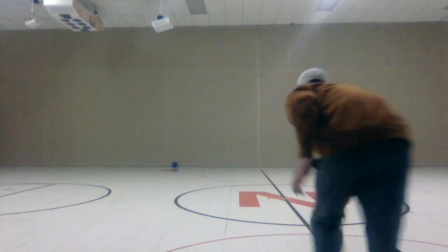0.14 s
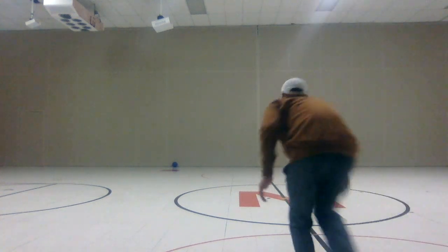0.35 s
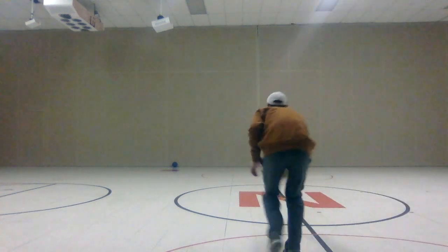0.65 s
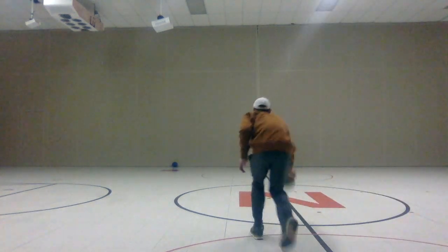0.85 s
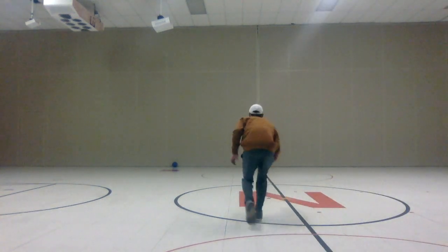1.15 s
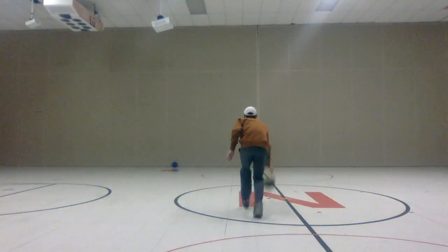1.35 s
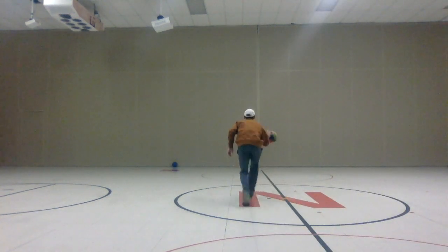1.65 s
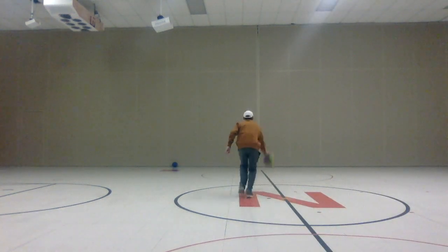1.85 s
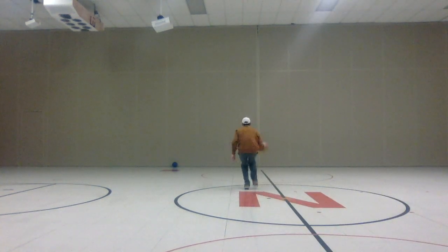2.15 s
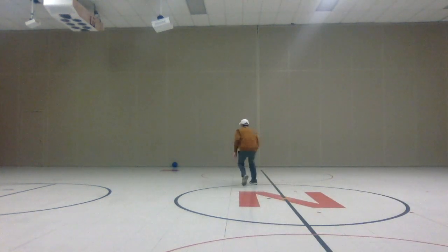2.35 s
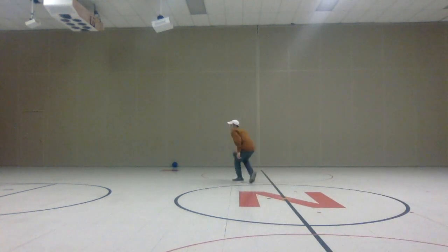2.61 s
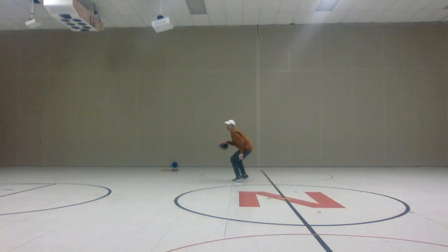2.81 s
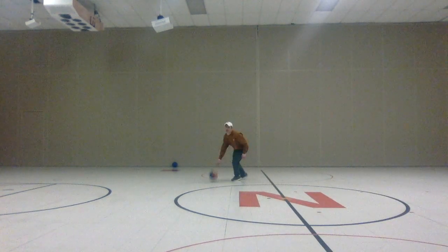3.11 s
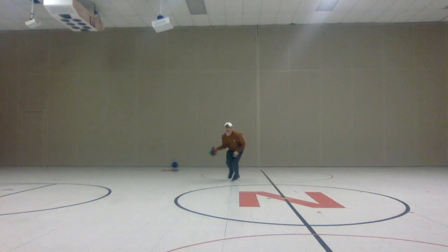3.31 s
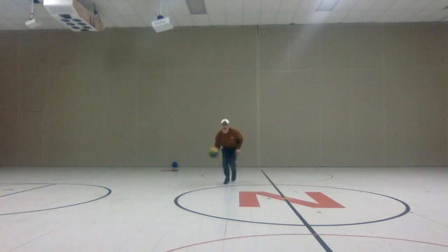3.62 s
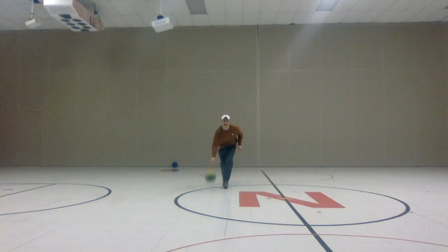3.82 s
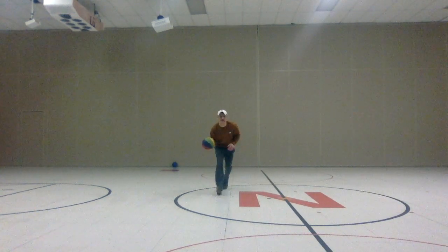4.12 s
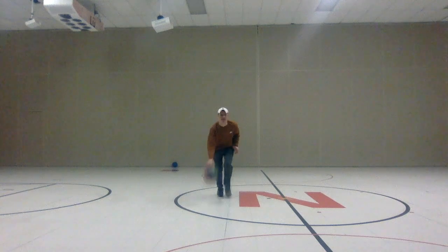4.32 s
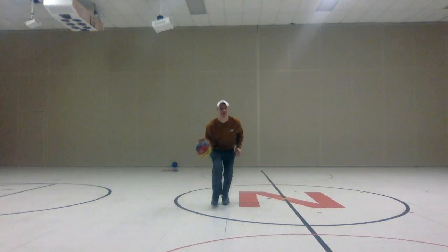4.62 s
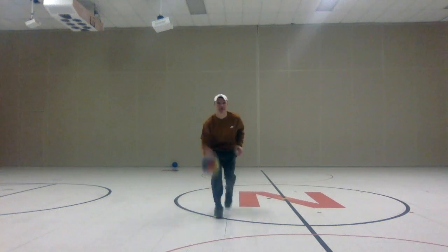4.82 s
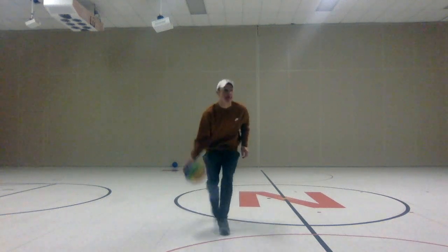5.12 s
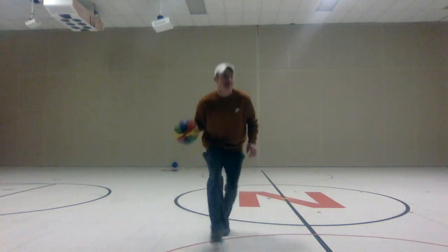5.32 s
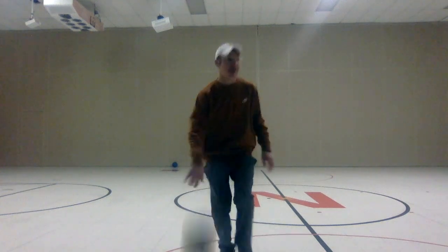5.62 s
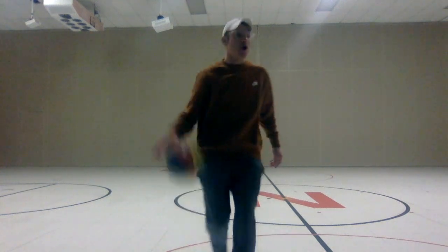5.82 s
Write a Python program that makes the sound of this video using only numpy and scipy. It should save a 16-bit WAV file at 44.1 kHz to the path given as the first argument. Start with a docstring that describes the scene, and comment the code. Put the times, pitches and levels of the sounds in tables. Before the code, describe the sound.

A ball is dribbled in a big, hard-walled, empty gym, heard through a small fixed microphone with thin deep bass and slightly clipped peaks. Sharp slaps with a short hollow boom, a floor thump and a faint airy ping fall at about 0.3, 0.85, 1.4 and 2.05 seconds, moving from roughly two to seven metres away and becoming more washed in echo. At 2.45 two quick heel knocks run into a brief, gritty sole skid with tiny squeaks, just before a softer, duller bounce at 2.6. Bounces at 3.2, 3.85, 4.45 and 5.05 come back, rounder and gradually closer. A small dry hand click comes at 5.5, then a loud, crisp, near bounce at 5.7. Every hit brings separate wall and ceiling echoes and a dense ring that is held up briefly, then ducks, leaving a faint lingering tail. Quiet, dull ventilation noise continues throughout.

```python
"""A player dribbles a ball away across the wooden floor of an empty gym, turns with a scuff of his shoes
and comes back. Each bounce is a shaped click for the slap, with damped sines for boards, shell and air.
His heels and skidding sole are noise bursts; a small click follows as the hand takes the ball.
Ceiling and walls answer with separate echoes that shift as he moves, then the hall rings out as decaying
noise in bands, its tail held up and pulled down by the recorder. Filtered noise is the ventilation."""
import sys
import numpy as np
from scipy import signal
from scipy.fft import rfft, irfft
from scipy.io import wavfile

SR = 44100
rng = np.random.default_rng(int(sys.argv[2]) if len(sys.argv) > 2 else 0)


def persist_wave(psi):
    """Save psi, clipped to +-1, as 16-bit WAV."""
    counts = np.round(np.clip(psi, -1, 1) * 32767).astype(np.int16)
    wavfile.write(sys.argv[1], SR, np.atleast_2d(counts).T)


N = 262511
RING = 65536  # samples in each struck sound and its reverberation
AGE = np.arange(RING) / SR  # s since the sound began
HZ = np.arange(RING + 1) * SR / (2 * RING)


def from_db(db):
    """Decibels to gain."""
    return 10 ** (np.asarray(db) / 20)


def at_hz(points, hz, axis=1):
    """Read one column of a table along a log-frequency axis."""
    points = np.array(points)
    return np.interp(np.log(np.maximum(hz, 1)), np.log(points[:, 0]), points[:, axis])


def at_distance(law, distance):
    """Level in dB of one part of a bounce at a given distance in metres."""
    db_at_zero, db_per_m = law
    return db_at_zero + db_per_m * distance


def ramp(start_s, length_s):
    """A straight rise from 0 to 1."""
    return np.clip((AGE - start_s) / length_s, 0, 1)


def convolve(a, b):
    """Pass one short sound through another."""
    return irfft(rfft(a, 2 * RING) * rfft(b, 2 * RING))[:RING]


def pulse(spectrum):
    """The most compact causal (minimum-phase) click with a given spectrum."""
    cepstrum = irfft(np.log(from_db(at_hz(spectrum, HZ))))
    cepstrum[1:RING] *= 2  # fold the cepstrum onto positive time
    return irfft(np.exp(rfft(cepstrum[:RING], 2 * RING)))[:RING]


def struck(modes, delay_s=0., polarity=1):
    """Damped sines set off by one blow; each mode is scaled by polarity once more than the one before."""
    age = np.maximum(AGE - delay_s, 0)
    total = np.zeros(RING)
    for k, (hz, db, t60_s) in enumerate(modes):
        decay = from_db(db - 60 * age / t60_s)
        total += polarity ** k * np.sin(2 * np.pi * hz * age) * decay
    return total


def burst(length_s):
    """Exponentially dying noise of unit energy."""
    noise = rng.standard_normal(RING) * np.exp(-np.minimum(AGE / length_s, 50))
    return noise / np.sqrt(np.sum(noise ** 2))


def add(out, s, sound):
    """Mix a sound in at a given time."""
    start = round(s * SR)
    out[start:start + RING] += sound[:N - start]


def mirrors(place, low, high):
    """A source and its images between two facing walls: (position m, dB)."""
    span = 2 * (low[0] + high[0])
    both_db = low[1] + high[1]
    return [(place, 0),
            (-2 * low[0] - place, low[1]), (2 * high[0] - place, high[1]),
            (place + span, both_db), (place - span, both_db)]


def echoes(sideways, distance, spreading=0.57):
    """Mirror-image echoes from walls and ceiling, timed and levelled against the direct sound."""
    # (metres from the microphone, reflection dB)
    left, right, behind, far = (13.61, -2), (11.8, 0.46), (1.42, -6), (12.24, 0)
    mic_height_m, ceiling_height_m, ceiling_db = 0.68, 5.36, -4  # heights above the floor
    sound_speed = 343  # m/s
    heights = [(mic_height_m, 0), (2 * ceiling_height_m - mic_height_m, ceiling_db)]
    images = []
    for x, x_db in mirrors(sideways, left, right):
        for y, y_db in mirrors(distance, behind, far):
            for z, z_db in heights:
                images.append((np.sqrt(x * x + y * y + z * z), x_db + y_db + z_db))
    path, db = np.transpose(images)  # the first one is the direct path
    lag = np.round((path - path[0]) / sound_speed * SR).astype(int)
    strength = from_db(db) * (path[0] / path) ** spreading
    return np.bincount(lag[1:], strength[1:], RING)[:RING]


def hall_bands(count=18, dulling_db=8, dulling_hz=9000, dulling_s=0.2):
    """Per band: its filter, the strength of single echoes, and a quick decay over a faint lingering one."""
    # diffuse sound of the hall: f/Hz, relative level of main decay/dB, its t60/s, lingering level/dB
    diffuse = [(60, -9, 0.94, -30), (123, -4.5, 0.98, -29), (232.4, 0, 0.83, -21.5), (448, 0, 0.67, -33),
               (824, 7.5, 0.35, -7), (1510, 8.5, 0.53, -19.5), (2800, -4, 0.8, -25), (4470, -1.5, 1, -33.5),
               (7100, -1.5, 0.74, -40), (9170, -5, 0.42, -44.5), (12600, 5, 0.35, -65),
               (16200, -15, .2, -66)]
    # colour of the single echoes: f/Hz, level/dB
    echo_colour = [(100, 0.5), (250, 3.5), (600, 4), (1400, 9.5), (2500, 0), (5000, 0), (9000, 5),
                   (16000, -4.5)]
    main_db, linger_t60_s = -1.28, 2.65
    near_peak_s, near_db = 0.016, -3
    walls_s, walls_rise_s = 0.042, 0.016
    hold_bass_db, hold_treble_db, bass_edge_hz = 5.5, 4.5, 190
    hold_rise_s, suppress_s, suppress_fall_s = 0.13, 0.24, 0.058

    centres = np.geomspace(50, 16000, count)
    # a puff scattered nearby, then a rise as the far walls answer
    near = from_db(near_db) * AGE / near_peak_s * np.exp(1 - AGE / near_peak_s)
    build_up = np.hypot(near, ramp(walls_s, walls_rise_s))
    # the recorder holds the tail up, then its noise suppression pulls it down
    hold = ramp(walls_s, hold_rise_s) * (1 - ramp(suppress_s, suppress_fall_s))
    bands = []
    for hz, member in zip(centres, np.eye(count)):
        band_filter = at_hz(np.c_[centres, member], HZ[::2])
        bass = 1 / (1 + (hz / bass_edge_hz) ** 4)
        hold_db = hold * (bass * hold_bass_db + (1 - bass) * hold_treble_db)
        # late treble dies ever faster
        loss_db = dulling_db * (hz / dulling_hz * AGE / dulling_s) ** 2
        dull = from_db(-np.minimum(loss_db, 100))
        decay_db = at_hz(diffuse, hz) - 60 * AGE / at_hz(diffuse, hz, axis=2)
        main = build_up * dull * from_db(main_db + hold_db + decay_db)
        linger = from_db(at_hz(diffuse, hz, axis=3) - 60 * AGE / linger_t60_s)
        echo_strength = dull * from_db(at_hz(echo_colour, hz))
        bands.append((band_filter, echo_strength, np.hypot(main, linger)))
    return bands


def gym(sound, spot, hall_db, bands, diffuse_db=-32, grain_db=6.0, merge_s=0.22,
        scatter_db=-9, scatter_s=0.0006, echo_db=-2, echo_t60_s=0.87):
    """Direct sound, slightly scattered echoes, and a grainy tail that merges into a smooth wash."""
    grain = np.log(from_db(grain_db)) * np.exp(-AGE / merge_s)
    noise = rng.standard_normal(RING)
    unevenness = np.clip(rng.standard_normal(RING), -2, 2)
    arrivals = rfft(noise * np.exp(grain * unevenness - grain ** 2))
    single = echoes(*spot)
    single = rfft(single + from_db(scatter_db) * convolve(single, burst(scatter_s)))
    early = sum(irfft(single * band) * strength for band, strength, _ in bands)
    early = early * from_db(echo_db - 60 * AGE / echo_t60_s)
    tail = sum(irfft(arrivals * band) * envelope for band, _, envelope in bands)
    return sound + convolve(sound, early + from_db(diffuse_db + hall_db) * tail)


def ventilation(level_db=-55.5):
    """Steady, dull air noise that fills the hall; its RMS level is set ahead of the microphone."""
    # relative spectrum of the air noise: f/Hz, level/dB
    air_noise = [(30, -21), (70, -12.5), (120, -3), (200, -11), (400, -13), (600, -18), (950, -13),
                 (1300, -21.5), (1750, -15), (3200, -40), (6000, -45), (10000, -53), (15000, -72)]
    hz = np.arange(N // 2 + 1) * SR / N
    noise = irfft(rfft(rng.standard_normal(N)) * from_db(at_hz(air_noise, hz)), N)
    return from_db(level_db) * noise / np.std(noise)


def dribble(bands, rasp_db=-9, rasp_s=0.0014, boards_lag_s=0.001, uneven_db=1.5):
    """The ball slaps the floor and booms, the boards thump, and the shell and the air inside it ring."""
    # bounces: t/s, distance/m, force/dB, then before force: hard edge/dB, plank knock/dB, air ping/dB
    bounces = [ (0.3057, 2.13, -0.6, -7.5, -1.5, -2.5), (0.8540, 3.78, -0.1, -5, -7.5, 1),
               (1.4045, 4.62, -0.96, -4.5, -7.5, -1), (2.0431, 7, 1, -7, -7.5, 2.5),
               (2.5809, 6.96, -2, -21.5, -10.5, -3.5), (3.205, 7.35, -0.34, -11.5, -16, 1.5),
               (3.868, 5.9, 1.24, -18, -13, -3), (4.4720, 4.65, 3, -23.5, -5.5, -0.5),
               (5.0265, 3.35, 1.08, -14.5, -10, 2.5), (5.7070, 1.54, 3, -2.5, -4.5, 1.5)]
    # relative spectra of the slap and of its hard edge: f/Hz, level/dB
    slap_spectrum = [(100, 10.5), (450, 9.5), (750, -3), (1050, -10.5), (1500, -6.5), (2000, 9),
                     (2650, 9.5), (4000, 8), (4900, 3.5), (6500, -1), (8000, -5.5), (10000, -11.5),
                     (12500, -22.5), (16000, -22)]
    edge_spectrum = [(100, -16), (2000, -3), (5000, 4.5), (10000, -3), (16000, -13)]
    # modes of sprung floor, single plank, rubber shell, enclosed air: f/Hz, relative level/dB, t60/s
    board_modes = [(120.9, -9, 0.082), (146.8, -17.5, 0.12)]
    plank_modes = [(730, -63, 0.0128), (740, -26, 0.011), (955, -26.5, 0.032)]
    shell_modes = [(404.4, -24, 0.017), (489.5, -35, 0.031)]
    air_modes = [(1146, -29, 0.027), (1271, -29, 0.038), (1377, -30, 0.051), (1522, -28, 0.024),
                 (1711, -31, 0.043)]
    boom_db, boom_t60_s = -12, 0.023  # on the scale of the shell's modes
    # (dB at zero distance, dB per metre)
    slap_law, thump_law, boom_law, hall_law = (0.22, -0.8), (2.08, -1.4), (5.53, -1.32), (-3.5, 1)
    # (sideways m, ball boom Hz, hall dB before the distance law)
    way_out, way_back, turned_s = (-0.7, 299, 1.2), (0.05, 244.6, -1.74), 3.0
    crack_hz, crack_db, crack_t60_s, crack_spread = 3170, -20.5, 0.005, 0.15  # spread in log frequency

    out, slap, edge = np.zeros(N), pulse(slap_spectrum), pulse(edge_spectrum)
    boards = struck(board_modes, boards_lag_s)  # the boards give way as the ball flattens
    plank = struck(plank_modes, polarity=-1.21)
    for s, distance, force_db, edge_db, knock_db, ping_db in bounces:
        sideways, boom_hz, hall_db = way_out if s < turned_s else way_back
        # the skin cracks as it lands, at a slightly different pitch each time
        pitch = crack_hz * np.exp(crack_spread * rng.standard_normal())
        crack = struck([(pitch, crack_db, crack_t60_s)])
        contact = from_db(at_distance(slap_law, distance)) * (slap + crack) + from_db(edge_db) * edge
        # the pebbled skin is crushed
        contact = contact + from_db(rasp_db) * convolve(contact, burst(rasp_s))
        shell = struck([(boom_hz, boom_db, boom_t60_s)] + shell_modes)
        # each landing stirs the air differently
        stirred = [(hz, db + ping_db + uneven_db * rng.standard_normal(), t60_s)
                   for hz, db, t60_s in air_modes]
        air = struck(stirred, polarity=-0.99)
        floor = from_db(at_distance(thump_law, distance)) * boards + from_db(knock_db) * plank
        ball = contact + from_db(at_distance(boom_law, distance)) * shell + air
        bounce = from_db(force_db) * (floor - ball)  # the ball is squeezed: pressure drops first
        spot_hall_db = hall_db + at_distance(hall_law, distance)
        add(out, s, gym(bounce, (sideways, distance), spot_hall_db, bands))
    return out


def shoes(bands, knock_db=-9, heel_s=0.0012, hall_db=-3, squeak_db=-15.5, squeak_t60_s=0.026):
    """Two heels land at the turn, then a rubber sole skids; each slip rings at a pitch of its own."""
    # relative spectrum of the sole on the floor: f/Hz, level/dB
    sole_spectrum = [(100, -16), (300, 1), (800, 10), (1500, 6), (2100, 6), (2700, 6.5), (3600, 4.5),
                     (6500, -9.5), (9000, -51), (16000, -37)]
    # heels landing: t/s, level/dB
    steps = [(2.4371, -12.5), (2.452, -13.5)]
    # short slips of the skidding sole: t/s, level/dB, length/s, squeak f/Hz
    slip_times = [(2.464, -10, 0.018, 2586), (2.481, -9, 0.012, 1110), (2.501, -11, 0.0053, 2700),
                  (2.519, -15, 0.005, 1960), (2.54, -13.5, 0.01, 1104)]
    turn_spot = (-.5, 7.6)  # (sideways m, distance m)

    out, sole = np.zeros(N), pulse(sole_spectrum)
    knock = struck([(260, -2.5, 0.0144), (387, -14, 0.072)])  # (Hz, dB, t60 s)
    contacts = []
    for s, db in steps:
        heel = convolve(sole, burst(heel_s)) + from_db(knock_db) * knock
        contacts.append((s, db, heel))
    for s, db, length_s, hz in slip_times:
        squeak = struck([(hz, squeak_db, squeak_t60_s)])
        contacts.append((s, db, convolve(sole + squeak, burst(length_s))))
    for s, db, sound in contacts:
        add(out, s, gym(from_db(db) * sound, turn_spot, hall_db, bands, echo_db=-12))
    return out


def tap(bands, tap_s=5.526, tap_db=1, hall_db=-14):
    """A small, dry click close to the microphone as the hand takes the ball: one compact pulse."""
    # relative spectrum of the click: f/Hz, level/dB
    click_spectrum = [(100, -4.5), (420, 5), (800, -7), (1200, -26), (1900, -12.5), (2500, 5.5),
                      (3200, -3.5), (3800, -15), (4400, -10.5), (5200, -33), (8000, -43), (16000, -63)]
    spot = (0.01, 1.7)  # (sideways m, distance m)
    out = np.zeros(N)
    click = from_db(tap_db) * pulse(click_spectrum)
    add(out, tap_s, gym(click, spot, hall_db, bands, echo_db=4, echo_t60_s=0.18))
    return out


def scene():
    """Ball, shoes, hand and ventilation in one hall."""
    bands = hall_bands()
    return (dribble(bands) + shoes(bands) + tap(bands) + ventilation())[None]


def record(dry, low_cut_hz=58, cutoff_hz=16000):
    """A small microphone sheds the deep bass, peaks are clipped just under full scale, the top is cut."""
    low_cut = signal.butter(3, low_cut_hz, "high", fs=SR, output="sos")
    top_cut = signal.ellip(10, .1, 90, cutoff_hz, fs=SR, output="sos")
    thin = signal.sosfilt(low_cut, dry)
    return signal.sosfilt(top_cut, np.clip(thin, -.95, .95))


dry = scene()
out = record(dry)
persist_wave(out)
```